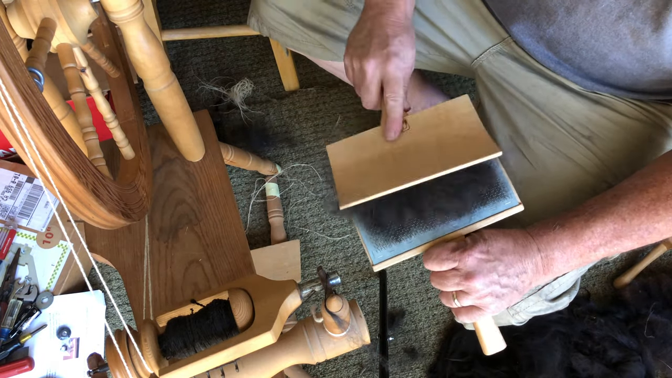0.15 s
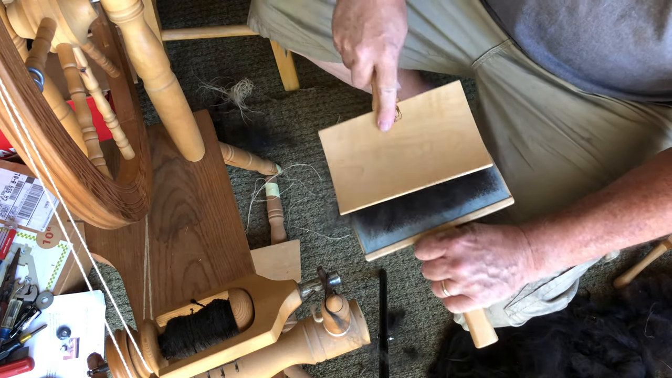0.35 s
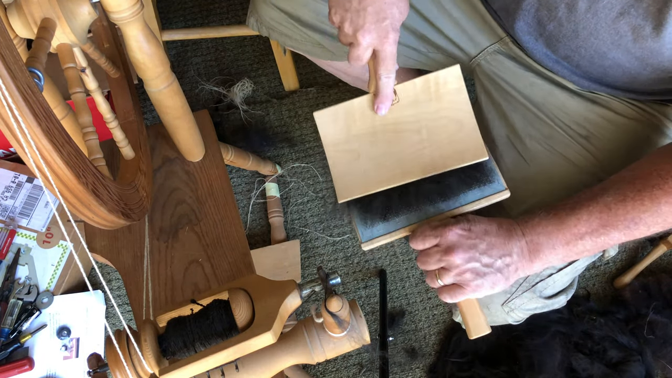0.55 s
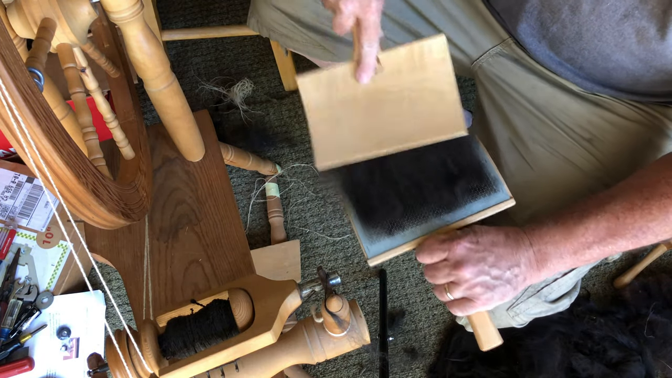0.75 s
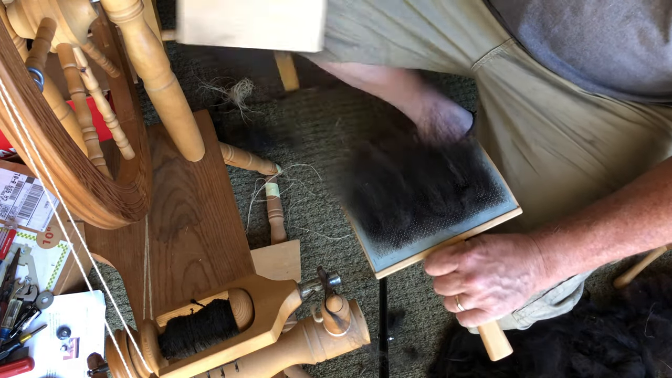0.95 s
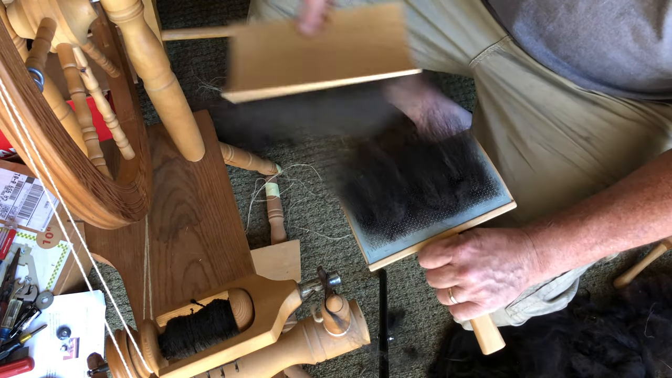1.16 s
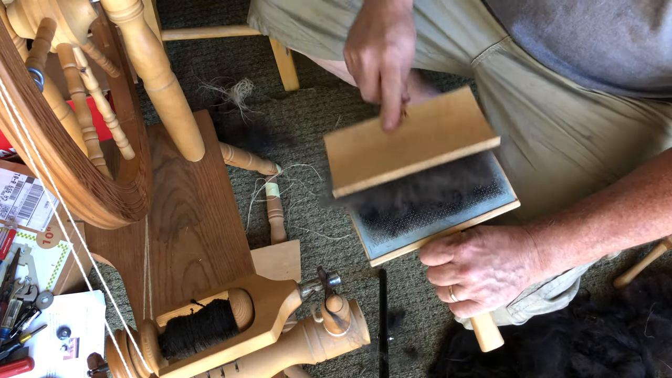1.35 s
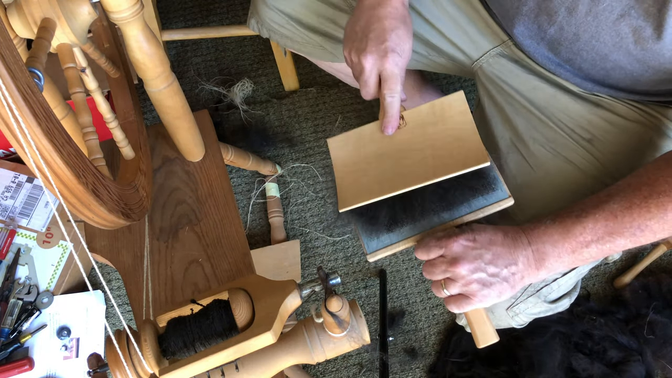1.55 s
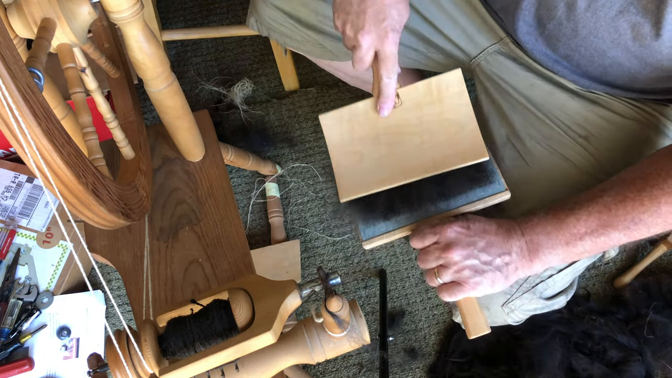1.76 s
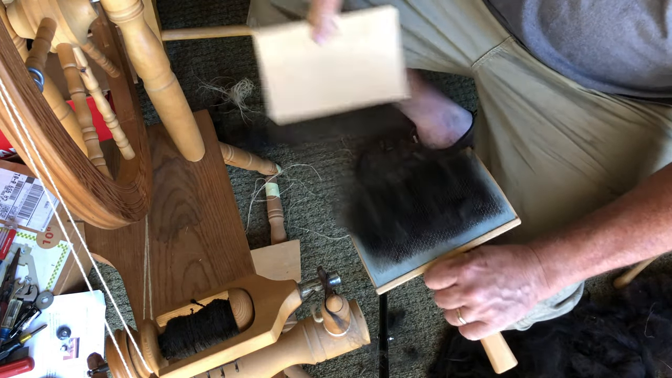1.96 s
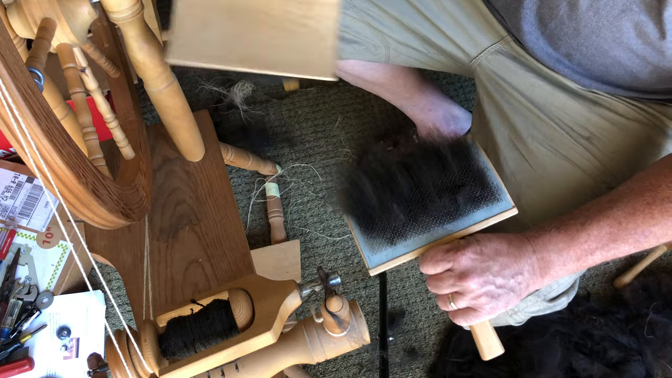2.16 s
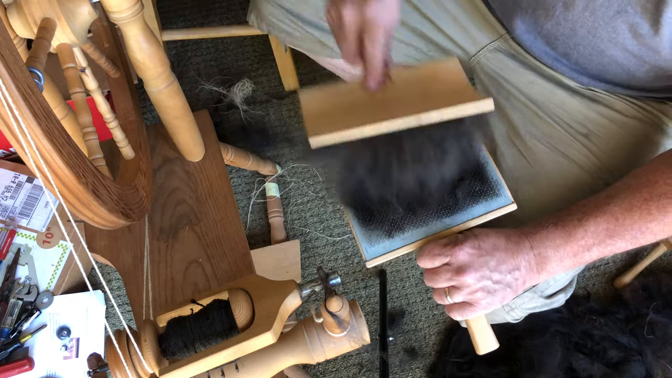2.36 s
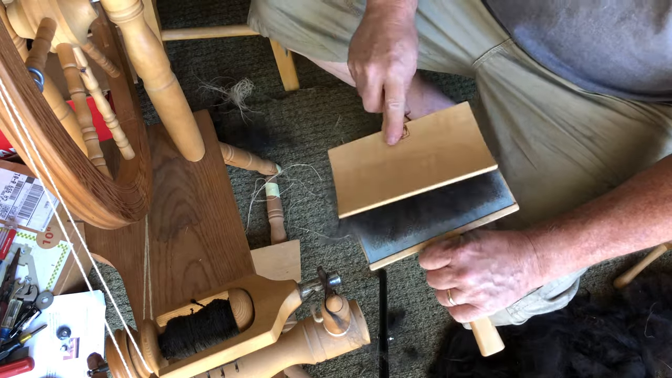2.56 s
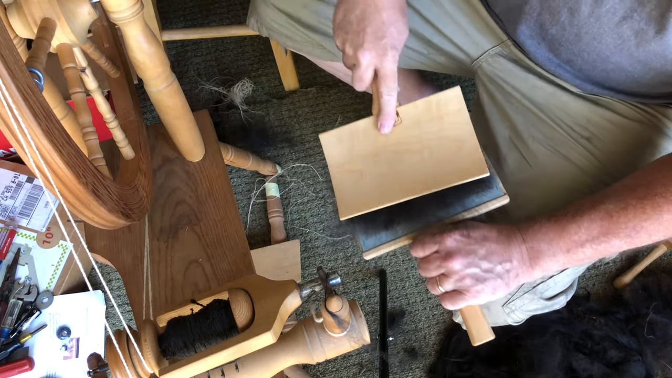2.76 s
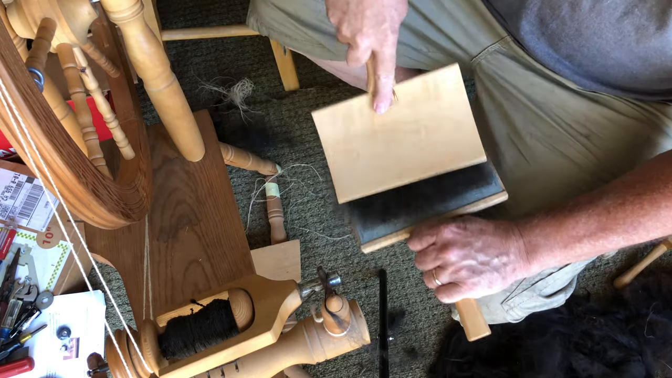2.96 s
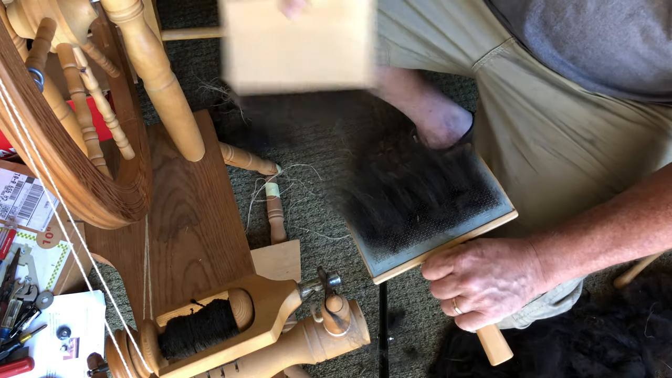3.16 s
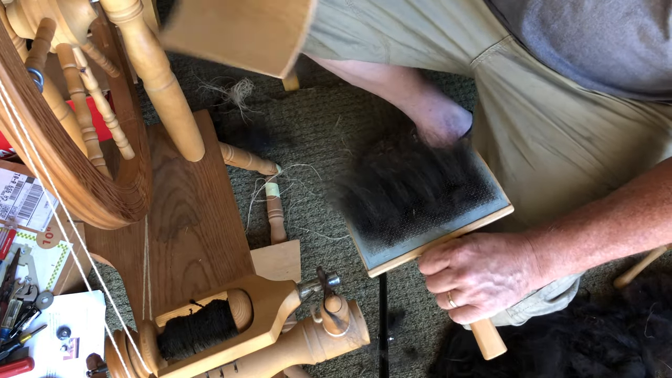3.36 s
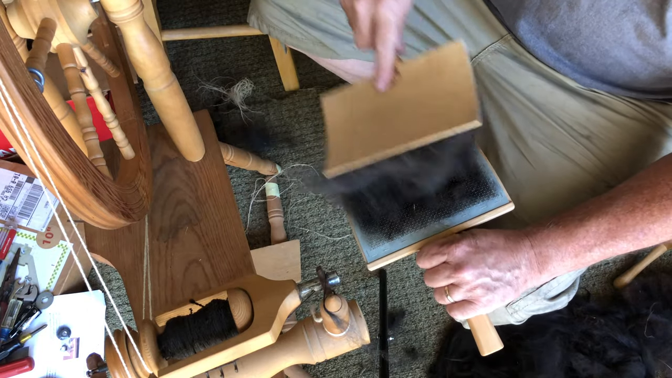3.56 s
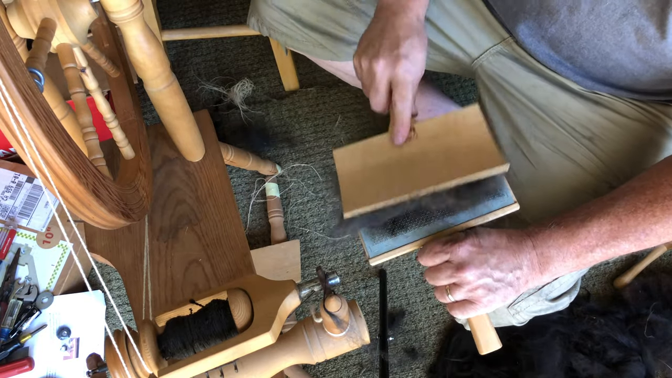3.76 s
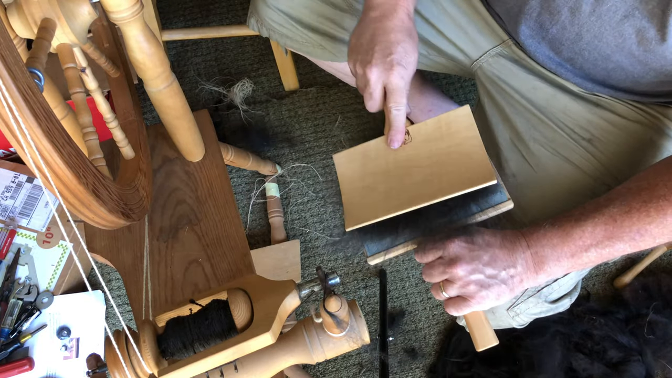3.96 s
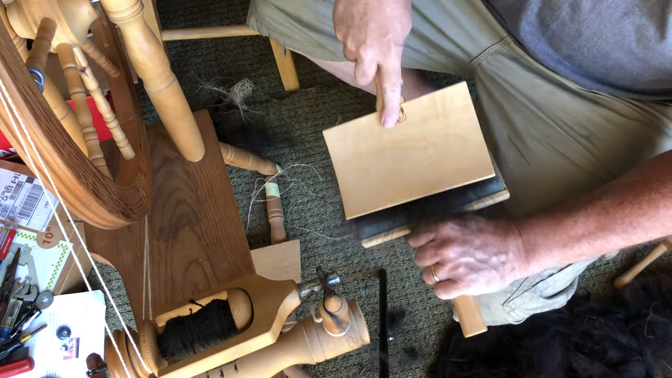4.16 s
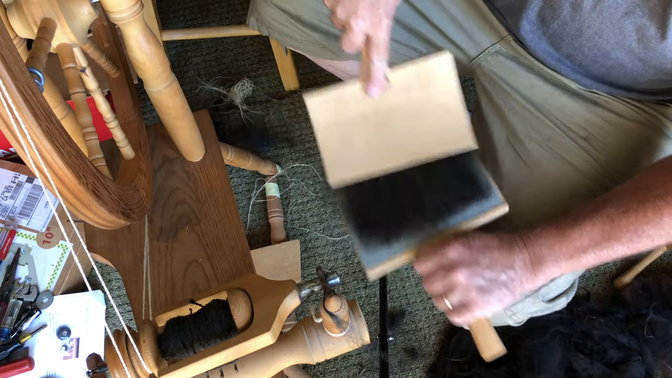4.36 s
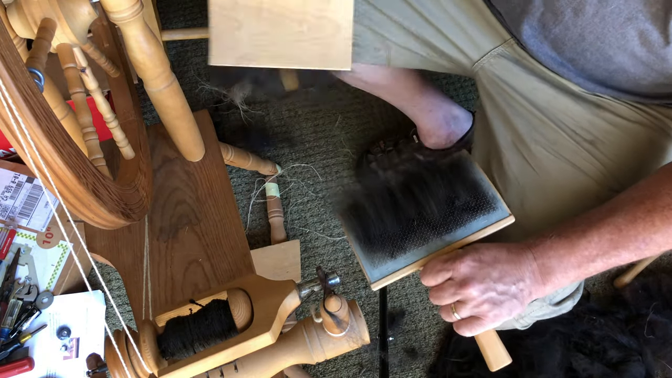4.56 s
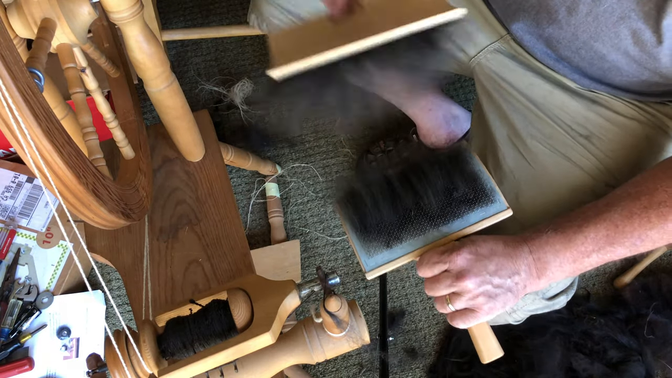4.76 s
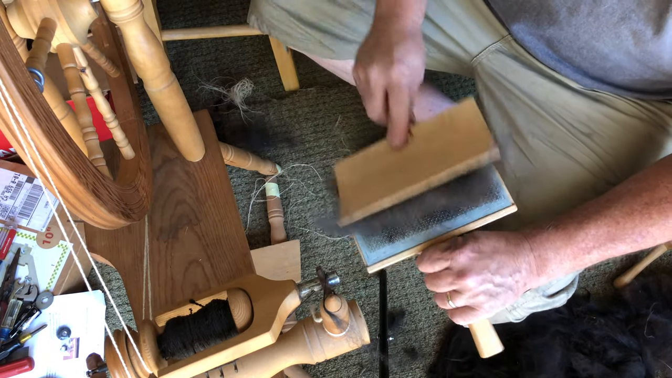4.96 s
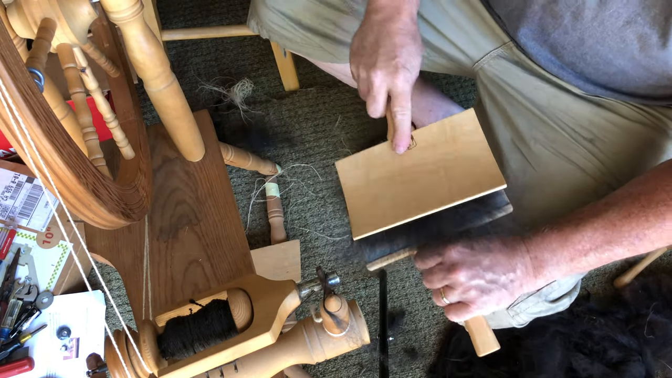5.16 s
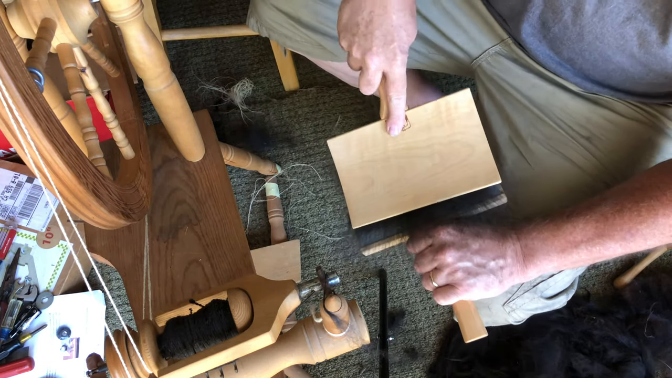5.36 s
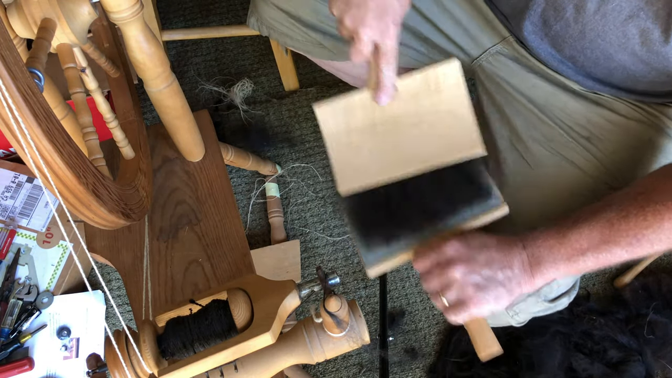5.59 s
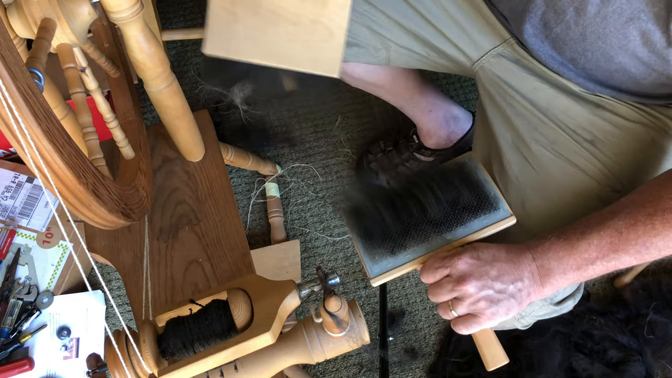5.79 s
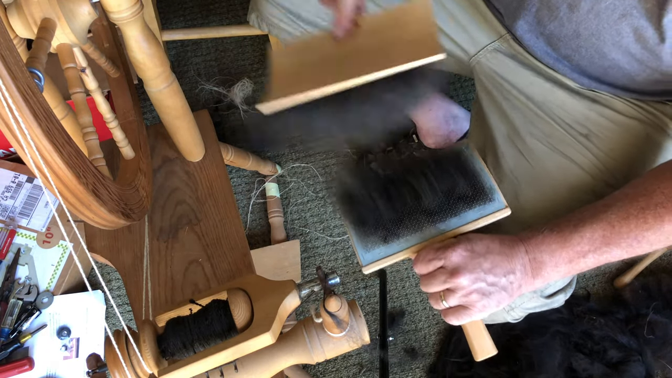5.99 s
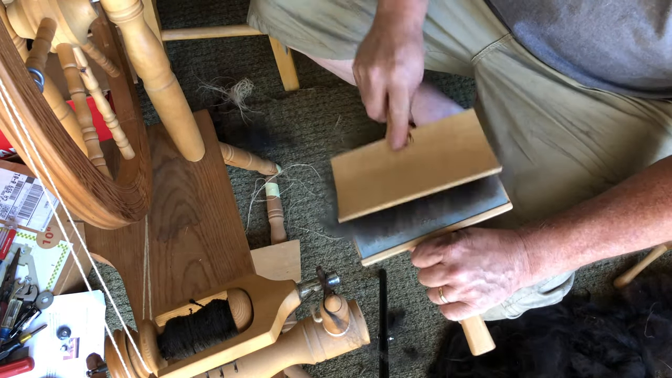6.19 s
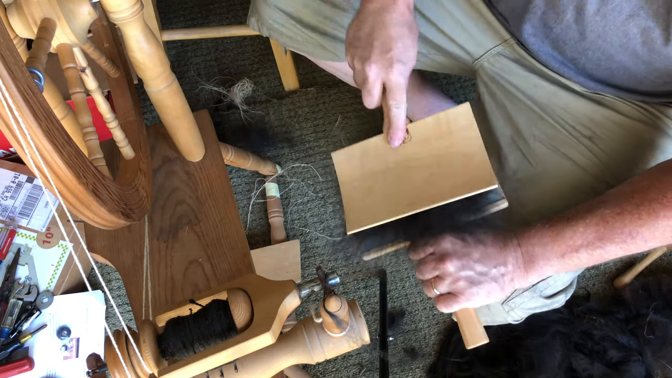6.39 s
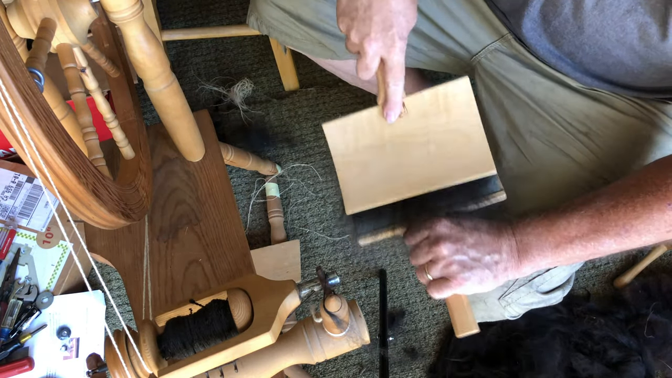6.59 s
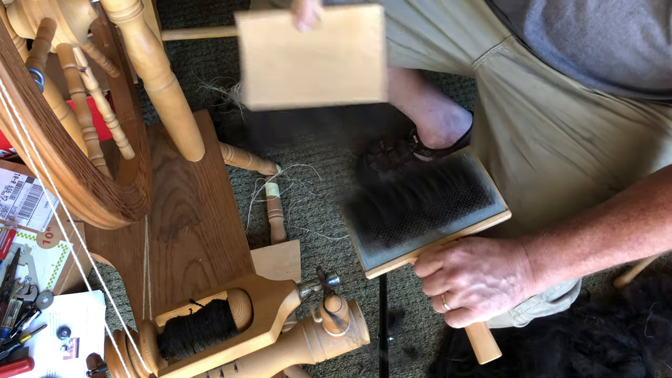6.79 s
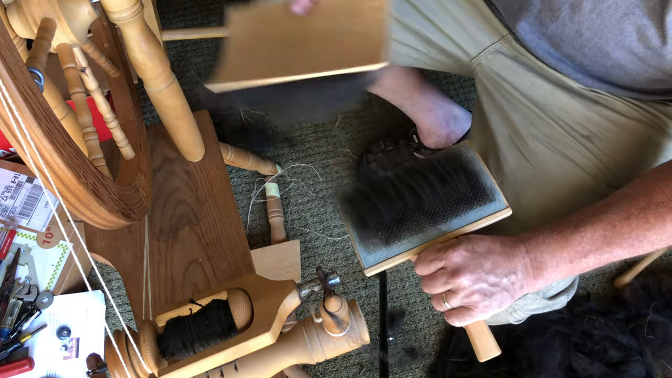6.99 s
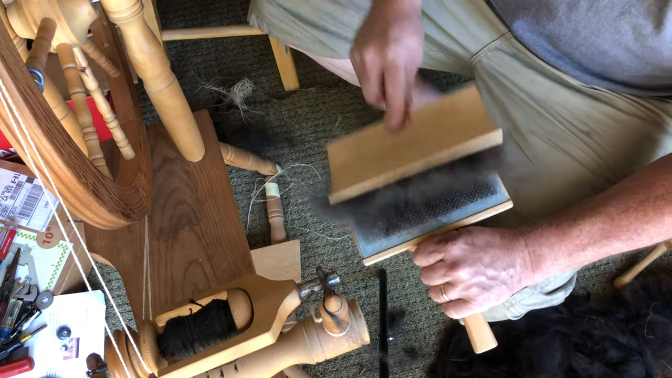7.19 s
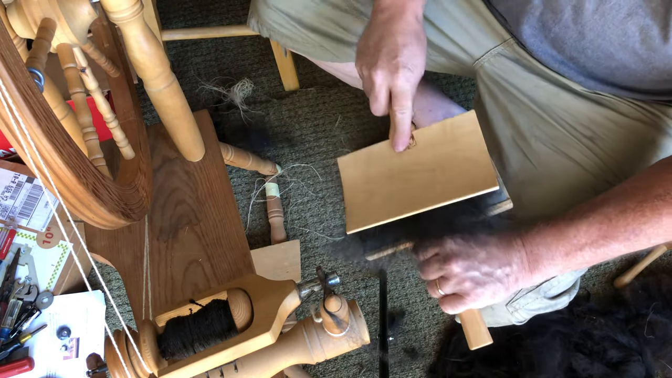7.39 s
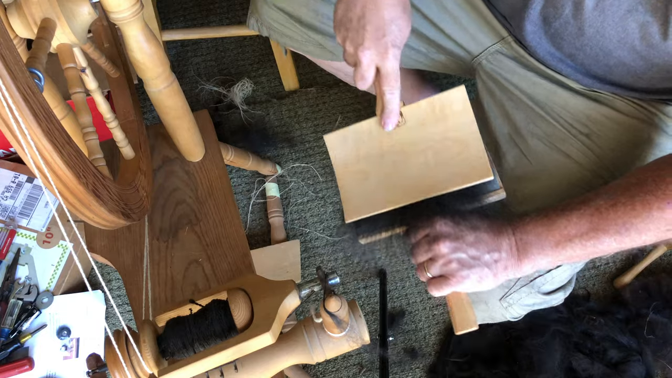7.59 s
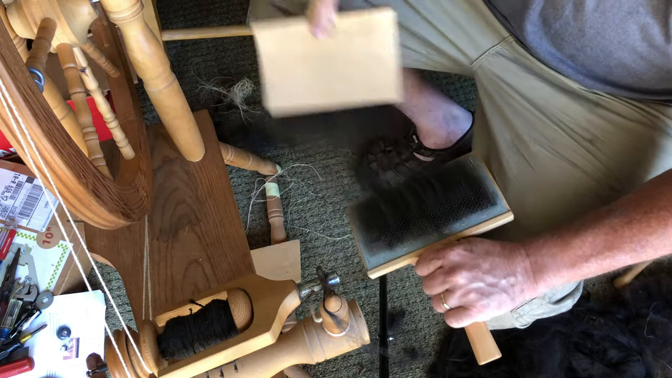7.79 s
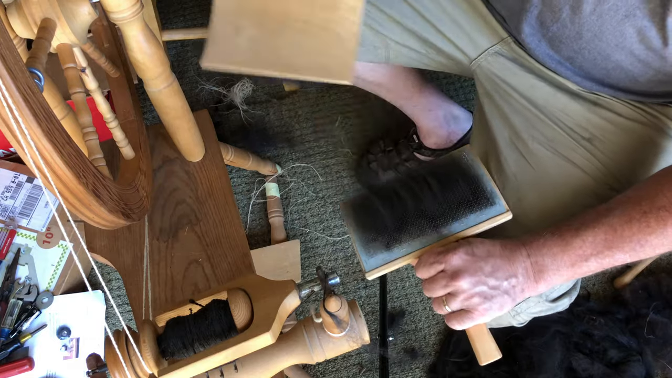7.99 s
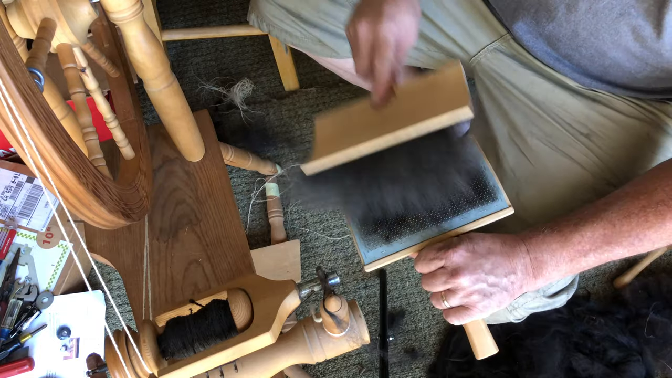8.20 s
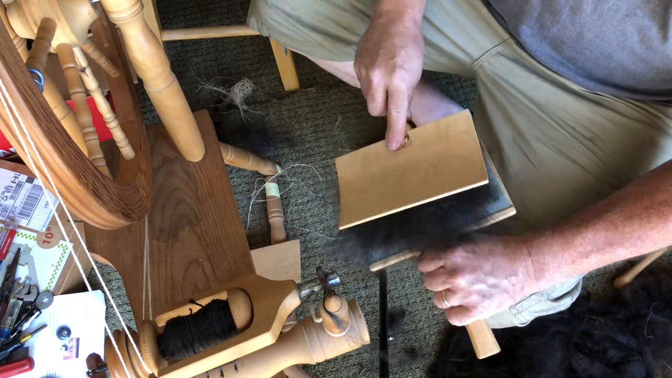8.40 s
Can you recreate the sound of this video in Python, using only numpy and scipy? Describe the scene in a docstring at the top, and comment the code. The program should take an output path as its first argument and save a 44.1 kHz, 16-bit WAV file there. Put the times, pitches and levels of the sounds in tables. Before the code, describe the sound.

In a small, softly furnished room with faint air and a very quiet, wavering low hum, wool is combed between two wooden hand cards close to the microphone. Strokes land at about 0.2, 1.5, 2.6, 3.9, 5.1, 6.3, 7.3 and 8.4 seconds. Each begins with a brief crunch of wire teeth and a soft low thud, then a gritty, woody rasp dotted with sharp ticks where teeth snag. The drag slackens, then swells as the cards pull apart, turning hollower and hissier before fading within about half to three quarters of a second. At 3.37 seconds, on the back swing, a card strikes wooden furniture: a loud, hard crack with a tiny rebound and short room echo. Around 4.8 seconds comes a barely audible brush of wool and sleeve. Later strokes pull more briskly and strongly; the last is just starting its rasp near the end.

```python
"""Wool is combed between two wooden hand cards in a small room, over still air and a faint wavering hum.
Each of eight strokes lands with a crunch of clustered wire-tooth clicks and a soft thud of decaying sines.
It then rasps as random tooth slips ring the wood and wire, ticks where teeth snag, and hisses as the cards part.
Once, on the back swing after the third stroke, the card cracks against wooden furniture and rebounds.
Later, between the fourth and fifth strokes, loose wool and a sleeve brush faintly as filtered tiny slips."""
import sys
import numpy as np
from scipy import signal
from scipy.fft import rfft, irfft
from scipy.io import wavfile

SR = 44100
rng = np.random.default_rng(int(sys.argv[2]) if len(sys.argv) > 2 else 0)


def persist_wave(psi):
    """Save psi, clipped to +-1, as 16-bit WAV."""
    counts = np.round(np.clip(psi, -1, 1) * 32767).astype(np.int16)
    wavfile.write(sys.argv[1], SR, np.atleast_2d(counts).T)


N = 372204
TIME = np.arange(N) / SR

# The card lands with a crunch, the teeth bite home once during or just after it, and its weight is a thud.
# Each row: start in seconds, crunch length in seconds, crunch level in dB, bite time in seconds,
# bite level in dB, wire against wood in dB, pitch of the spot struck in Hz, thud level in dB, thud pitch in Hz.
LANDINGS = [(0.198, .022, -43.5, 0.2055, -38, -4.5, 1800, -38, 194),
            (1.478, .005, -35, 1.4893, -37.5, -4.5, 1900, -45, 240),
            (2.5617, .014, -48, 2.562, -42.5, -6, 1050, -46, 203),
            (3.8675, .008, -38.5, 3.8701, -26.5, -6, 1250, -53, 267),
            (5.0597, .018, -42, 5.0758, -34, -5.5, 1200, -32.5, 211),
            (6.2838, .014, -35.3, 6.2842, -31.5, -3.5, 1550, -34, 211),
            (7.3395, .014, -38.5, 7.344, -33.5, -5, 1400, -38, 217),
            (8.3725, .014, -36.5, 8.3795, -29.5, -3, 1650, -32, 260)]
# Colour of the wire teeth when struck. Each row: frequency in Hz, relative level in dB.
WIRE_STRUCK = [(2500, -31.5), (4000, -3), (4900, 0), (5700, -1), (6400, -4), (7600, -1.5), (9600, 1.5),
               (11000, -6.5), (13000, -7.5), (16000, -16)]


def effort():
    """The pull of the arm: gain of the rasp, gain of the hiss, and how far apart the cards are (0-1)."""
    # A stroke draws, slows as the wool binds, swells as the cards are pulled apart, and fades.
    # Each row: start in seconds, draw level in dB, slowest point in seconds after the start, its level in dB,
    # peak of the pull in seconds after the start, its level in dB, fade length in seconds.
    stroke_plan = [(0.21, -54.3, .42, -60.5, .52, -51.5, .235), (1.49, -53.3, .155, -58, .375, -50.7, .16),
                   (2.575, -51.8, .39, -58.5, .458, -48.3, .15), (3.88, -52, .395, -57, .503, -47.7, .145),
                   (5.075, -50.3, .395, -64, .535, -48.3, .155), (6.295, -50.8, .305, -54, .385, -45, .125),
                   (7.35, -49.7, .315, -53, .372, -44, .105), (8.385, -52, .33, -56, .41, -47, .15)]
    sag_db_per_s, slowing_s, clear_db = 3, .08, -73  # the draw tires, takes this long to slow, ends here
    # the wire's hiss against the rasp of the backs grows as the teeth unmesh
    wire_meshed_db, wire_pulled_db, wire_clear_db = -9.3, -2.8, -5
    uneven_db, uneven_hz = .9, 22  # lumps in the wool vary the drag

    rasp, hiss, apart = np.zeros((3, N))
    for start, draw_db, slow, slow_db, pull, pull_db, fade in stroke_plan:
        end = pull + fade
        on = (TIME >= start) & (TIME < start + end)
        t = TIME[on] - start
        draw = max(slow - slowing_s, 0)
        tired_db = draw_db - sag_db_per_s * draw
        db = np.interp(t, [0, draw, slow, pull, end], [draw_db, tired_db, slow_db, pull_db, clear_db])
        wire_db = np.interp(t, [0, pull, end], [wire_meshed_db, wire_pulled_db, wire_clear_db])
        rasp[on] = amp(db)
        hiss[on] = amp(db + wire_db)
        apart[on] = np.clip((t / end - .25) / 0.67, 0, 1)
    rasp *= amp(uneven_db * wander(rate_hz=uneven_hz))
    hiss *= amp(uneven_db * wander(rate_hz=uneven_hz))
    return rasp, hiss, apart


def strokes(rasp, hiss, apart, catch_share=0.32):
    """Thousands of teeth slip past each other; the backs ring more hollow as the cards part."""
    # Colour of the wooden backs with the teeth meshed. Each row: frequency in Hz, relative level in dB.
    meshed_colour = [(120, -59.5), (200, -6), (232, -9), (264, -20.5), (318, -6), (469, -5.5), (580, -9),
                     (845, -6), (1020, 1), (1130, -3.5), (1540, -1), (2390, -4.5), (2750, -5.5),
                     (4000, -11.5), (5200, -48), (8800, -120)]
    # Colour of the wooden backs while parting. Each row: frequency in Hz, relative level in dB.
    parting_colour = [(120, -42), (200, -12.5), (334, -1), (424, 0), (675, -10.5), (736, -4), (814, -4),
                      (1070, -1), (1640, -7.5), (2220, -2.5), (2640, -7), (3270, -5.5), (3660, -12),
                      (4000, -17.5), (5200, -46), (8800, -120)]
    # Colour of the wire teeth, sliding. Each row: frequency in Hz, relative level in dB.
    wire_colour = [(2350, -35.5), (4000, -1), (5440, -2.5), (7700, -9), (10400, -3.5), (15100, -16.5),
                   (16000, -16)]
    # Last tufts of wool dragging through the wire tips. Each row: middle in seconds, hiss level in dB.
    tuft_times = [(0.868, -57.5), (2.01, -69), (3.12, -68), (4.505, -69)]
    tuft_half_s = .028

    grip = amp(1.67 * wander(rate_hz=82))  # rows of teeth bind and let go together
    # now and then a tooth holds on longer and lets go with a short chatter
    release = np.exp(-np.arange(SR // 200) / SR / 0.00053)
    chatter = rng.standard_normal(N) * through(slips(per_s=130, spread_db=2.0), release)
    catches = catch_share * unit(chatter)
    teeth = unit(grip * slips(per_s=3200, spread_db=2.5)) + catches
    fibres = unit(grip * slips(per_s=9000, spread_db=2.0)) + catches

    meshed = through(teeth, response(meshed_colour))
    meshed = roaming(meshed, hz=1540, width_hz=170, db=-1, swing=.3)
    parting = through(teeth, response(parting_colour))
    parting = roaming(parting, hz=1150, width_hz=230, db=-4, swing=.15)
    wire = through(fibres + .8 * teeth, response(wire_colour))
    wire = roaming(wire, hz=9900, width_hz=780, db=-14, swing=0.11)

    tufts = sum(amp(db) * swell(s, tuft_half_s) for s, db in tuft_times)
    backs = (1 - apart) * meshed + apart * parting
    return rasp * backs + np.hypot(hiss, tufts) * wire


def snags(rasp, hiss, length=0.0012):
    """A caught tooth springs free with one sharp tick; the lesser ones follow the force of the stroke."""
    # The loudest teeth that catch and spring free.
    # Each row: time in seconds, wood level in dB, wire level in dB, pitch of the spot struck in Hz.
    loud_snags = [(0.270, -39, -56, 1300), (0.3052, -40, -52.3, 1590), (0.3772, -39, -49, 1900),
                  (0.4105, -41, -47.5, 1760), (0.5594, -44, -50, 1360), (0.8335, -47, -54, 1660),
                  (1.5282, -42, -48, 1850), (1.5768, -40, -51.5, 1580), (1.6684, -35, -44, 1780),
                  (2.6148, -38, -54, 1340), (2.663, -42, -45, 1580), (2.734, -41, -45, 1950),
                  (3.9323, -33.5, -37.5, 1450), (4.0009, -40, -38.5, 1030), (4.0554, -40, -46, 2000),
                  (5.1056, -36, -45, 1160), (5.1573, -38, -38.5, 1280), (5.279, -33.5, -43, 1390),
                  (5.564, -43, -47, 1300), (6.4763, -38.5, -43, 1570), (6.6206, -39, -46, 1050),
                  (7.693, -40, -42, 2240), (7.7389, -45, -38.5, 2190)]
    # lesser snags come by chance during strokes, at levels over the rasp (wood) and the hiss (wire)
    per_s, over_rasp_db, over_hiss_db, spread_db = 14, 5, 6, 2
    spot_low_hz, spot_high_hz = 1000, 2500

    wire, out = response(WIRE_STRUCK), np.zeros(N)
    for s, wood_db, wire_db, hz in loud_snags:
        add(out, s, crunch(struck_back(hz), length, wood_db))
        add(out, s, crunch(wire, length, wire_db))
    for i in np.flatnonzero((rng.random(N) < per_s / SR) & (rasp > 0)):
        hz = rng.uniform(spot_low_hz, spot_high_hz)
        db = spread_db * rng.standard_normal()
        add(out, i / SR, rasp[i] * crunch(struck_back(hz), length, over_rasp_db + db))
        add(out, i / SR, hiss[i] * crunch(wire, length, over_hiss_db + db))
    return out


def landings(bite_length=.0027):
    """The card comes down row by row in a quick crunch, and the teeth bite home during or just after it."""
    wire, out = response(WIRE_STRUCK), np.zeros(N)
    for s, length, crunch_db, bite, bite_db, wire_db, hz, _, _ in LANDINGS:
        for at, span, db in (s, length, crunch_db), (bite, bite_length, bite_db):
            add(out, at, crunch(struck_back(hz), span, db))
            add(out, at, crunch(wire, span, db + wire_db))
    return out


def thuds(t60=0.02, rise=0.0045, twist_ratio=2.41, twist_db=-12, lap_hz=130, lap_db=-12, lap_t60=0.057):
    """The lower card flexes and twists on its handle, and the hand holding it gives a little."""
    lag_s = .0115  # the weight arrives after the first teeth
    t, out = np.arange(SR // 4) / SR, np.zeros(N)
    envelope = (1 - np.exp(-t / rise)) * decay(t, t60)
    envelope /= envelope.max()
    give = amp(lap_db) * np.sin(2 * np.pi * lap_hz * t) * decay(t, lap_t60)
    for s, *_, db, hz in LANDINGS:
        flex = np.sin(2 * np.pi * hz * t)
        twist = amp(twist_db) * np.sin(2 * np.pi * hz * twist_ratio * t)
        add(out, s + lag_s, amp(db) * ((flex + twist) * envelope + give))
    return out


def knock(modes_db=-3):
    """Wood on wood: a hard crack, a short dense clack and a few longer modes."""
    # The card striking furniture and rebounding. Each row: time in seconds, crack level in dB, ring level in dB.
    contacts = [(3.3739, -14, -42.5), (3.3751, 1, -23.5), (3.393, -18, -43)]
    # Colour of the furniture's crack. Each row: frequency in Hz, relative level in dB.
    crack_colour = [(30, -36), (130, -8.5), (280, -3.5), (390, -9), (520, -1), (680, 0), (1000, -2),
                    (1500, -3), (2000, -4), (3000, -7.5), (4200, -10.5), (5500, -9.5), (7200, -7.5),
                    (10000, -15.5), (16000, -24)]
    # How the furniture's crowded modes die. Each row: frequency in Hz, t60 in seconds.
    clack_decay = [(150, .12), (700, .08), (1400, .09), (2500, .07), (4000, .04), (8000, .025),
                   (16000, .02)]
    # The furniture's clearest modes. Each row: frequency in Hz, relative level in dB, t60 in seconds.
    clear_modes = [(172, -13, .3), (228, -12, .14), (285, -8, .08), (570, -12, .08), (610, -10, .06),
                   (662, -6, .05), (770, -8, .05), (1040, -9, .05), (1265, -22, .25), (1350, -21, .18)]

    t, out = np.arange(SR // 2) / SR, np.zeros(N)
    crack = dispersed(response(crack_colour))
    modes = np.zeros(len(t))
    for hz, db, t60 in clear_modes:
        modes += amp(db) * np.sin(2 * np.pi * hz * t) * decay(t, t60) * rng.choice([-1, 1])
    for s, crack_db, ring_db in contacts:
        clack = through(dying_noise(clack_decay, len(t)), crack)
        add(out, s, amp(crack_db) * crack)
        add(out, s, amp(ring_db) * (clack + amp(modes_db) * modes))
    return out


def rustle(middle=4.83, half_length=.07, level_db=-74):
    """Loose wool and a sleeve brush faintly in mid-swing, as a swell of tiny slips ringing the wire."""
    brush = unit(through(slips(per_s=2500, spread_db=2), response(WIRE_STRUCK)))
    return amp(level_db) * swell(middle, half_length) * brush


def room(x, early_db=-3, count=10):
    """A few reflections off nearby things, then a diffuse tail that dies soonest in the high treble."""
    # How the echo dies. Each row: frequency in Hz, t60 in seconds.
    echo_decay = [(150, .38), (500, .45), (1300, .52), (4000, .45), (7000, .32), (15000, .2)]
    # What carpet and clothes leave of the echo. Each row: frequency in Hz, gain in dB.
    soak = [(200, -1), (1300, 0), (4000, -3), (15000, -9)]

    t = np.arange(SR * 3 // 5) / SR
    tail = dying_noise(echo_decay, len(t)) * np.clip(t / .012, 0, 1)
    tail /= np.linalg.norm(tail)
    taps = (rng.uniform(0.0033, .02, count) * SR).astype(int)
    tail[taps] += amp(early_db) * rng.choice([-1, 1], count) / np.sqrt(count)
    soaked = amp(read(soak, np.fft.rfftfreq(len(t), 1 / SR)))
    return through(x, irfft(rfft(tail) * soaked))


def background(air_db=-63):
    """Still room air as coloured noise, with the faint, wavering hum of a mains appliance."""
    # Colour of the air. Each row: frequency in Hz, relative level in dB per Hz.
    air_colour = [(20, -9.5), (40, -10.5), (58, -9.5), (78, -10), (120, -7), (160, -8.5), (250, -12),
                  (400, -17.5), (600, -21.5), (900, -25.5), (2000, -29), (4400, -33.5), (7000, -40),
                  (16000, -46)]
    # The appliance's tones, before they waver. Each row: frequency in Hz, rms level in dB.
    hum_tones = [(98, -68), (151, -74)]

    colour = amp(read(air_colour, np.fft.rfftfreq(N, 1 / SR)))
    air = unit(irfft(rfft(rng.standard_normal(N)) * colour, N))
    hum = np.zeros(N)
    for hz, db in hum_tones:
        gain = amp(db + 2 * wander(rate_hz=4)) * np.sqrt(2)
        hum += gain * np.sin(2 * np.pi * hz * TIME + .7 * wander(rate_hz=4))
    return amp(air_db) * air + hum


def slips(per_s, spread_db):
    """A random train of tiny slips, a few much larger than the rest."""
    size = amp(spread_db * np.minimum(rng.exponential(1, N), 4))
    return size * rng.choice([-1., 1.], N) * (rng.random(N) < per_s / SR)


def crunch(ring, length, db):
    """A cluster of tooth clicks, about length seconds long, ringing a body."""
    length = max(length, 1 / 2000)
    t = np.arange(SR // 30) / SR
    clicks = rng.standard_normal(len(t)) * np.exp(-(t / length) ** 4)
    sound = signal.fftconvolve(clicks, ring)
    return amp(db) * sound * np.sqrt(length * SR) / np.linalg.norm(sound)


def struck_back(hz, spot_db=2, width_hz=270):
    """The wooden back's ring, with the mode under the spot struck standing out."""
    # Colour of the wooden backs on landing. Each row: frequency in Hz, relative level in dB.
    landed_colour = [(100, -31.5), (300, -14), (520, -11), (700, -15.5), (900, -2.5), (1170, -2.5),
                     (1400, -4.5), (1720, -4), (2300, -10), (2700, -7), (3700, -18), (4400, -22),
                     (6000, -41)]
    ring = response(landed_colour)
    return ring + amp(spot_db) * resonate(ring, hz, width_hz)


def roaming(x, hz, width_hz, db, swing):
    """The contact roams over the card, favouring one mode after another."""
    moving_hz = hz * np.exp(swing * np.tanh(wander(rate_hz=9)))
    return unit(x + amp(db) * resonate(x, moving_hz, width_hz))


def resonate(x, hz, width_hz):
    """A resonance at hz, fixed or moving: shift down to zero, smooth, shift back."""
    turn = np.exp(2j * np.pi * np.cumsum(hz * np.ones(len(x))) / SR)
    keep = np.exp(-np.pi * width_hz / SR)
    smooth = signal.lfilter([1 - keep], [1, -keep], x / turn + 1e-18)
    return 2 * (turn * smooth).real


def dying_noise(decays, size):
    """Crowded modes, rms 1 at first, each band dying at its own speed."""
    hz, t, z = signal.stft(rng.standard_normal(size), SR, nperseg=128)
    t60 = np.maximum(read(decays, hz), 1 / 100)[:, None]
    return signal.istft(z * decay(t, t60), SR, nperseg=128)[1][:size]


def dispersed(ring, spread=.0014):
    """Bending waves in wood: the treble arrives first, the bass up to spread seconds later."""
    size = 2 * len(ring)
    hz = np.fft.rfftfreq(size, 1 / SR)
    delay = spread * (1 - 2 * hz / SR) ** 2
    phase = 2 * np.pi * np.cumsum(delay) * hz[1]
    return irfft(rfft(ring, size) * np.exp(-1j * phase))[:len(ring)]


def response(points, size=4096):
    """The causal (minimum-phase) impulse response of a body with this colour, energy 1."""
    db = np.maximum(read(points, abs(np.fft.fftfreq(size, 1 / SR))), -90)
    log_gain = np.log(amp(db))
    ring = np.fft.ifft(np.exp(np.conj(signal.hilbert(log_gain)))).real[:size // 2]
    return ring / np.linalg.norm(ring)


def through(x, ring):
    """Plays x through an impulse response."""
    return signal.oaconvolve(x, ring)[:len(x)]


def wander(rate_hz):
    """Slow chance of rms 1: noise that thins out above rate_hz."""
    hz = np.fft.rfftfreq(N, 1 / SR)
    return unit(irfft(rfft(rng.standard_normal(N)) / (1 + (hz / rate_hz) ** 4), N))


def swell(middle, half_length):
    """A smooth rise and fall of height 1."""
    return np.exp(-((TIME - middle) / half_length) ** 2)


def decay(t, t60):
    """An exponential fade that has fallen 60 dB after t60 seconds."""
    return np.exp(-np.log(1000) * t / t60)


def amp(db):
    """Decibels to gain."""
    return 10 ** (np.asarray(db) / 20)


def unit(x):
    """Scales to rms 1."""
    return x / np.sqrt(np.mean(x ** 2) + 1e-20)


def read(points, hz):
    """Reads a table on a log-frequency axis."""
    f, value = np.transpose(points)
    return np.interp(np.log(hz + 1), np.log(np.abs(f) + 1), value)


def add(mix, s, sound):
    """Mixes a sound in at time s in seconds."""
    part = mix[max(round(s * SR), 0):][:len(sound)]
    part += sound[:len(part)]


def scene():
    """The cards are near; the knock is farther off and fills the room more."""
    rasp, hiss, apart = effort()
    combing = strokes(rasp, hiss, apart) + rustle() + snags(rasp, hiss)
    hits = landings() + thuds()
    bump = knock()
    echo = room(amp(-13) * combing + amp(-11.5) * hits + amp(-9.5) * bump)
    return (combing + hits + bump + echo + background())[None]


def record(dry, low_cut_hz=60, edge_hz=16100):
    """A small microphone that loses the deep bass, then a steep band limit in the high treble."""
    thin = signal.sosfilt(signal.butter(2, low_cut_hz, "high", fs=SR, output="sos"), dry)
    low_pass = signal.firwin(511, edge_hz, window=("kaiser", 9), fs=SR)
    return signal.oaconvolve(thin, low_pass[None], "same")


dry = scene()
out = record(dry)
persist_wave(out)
```